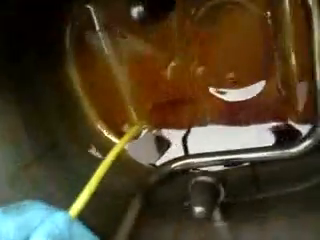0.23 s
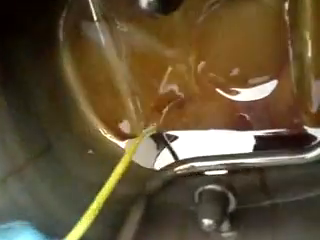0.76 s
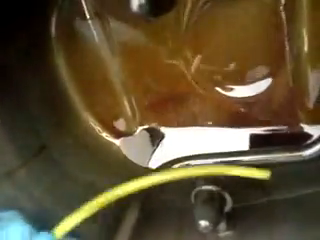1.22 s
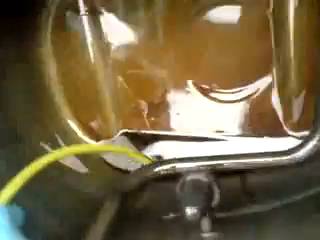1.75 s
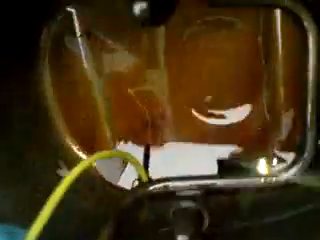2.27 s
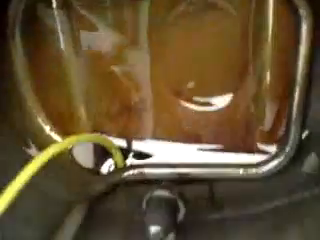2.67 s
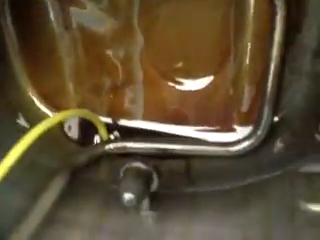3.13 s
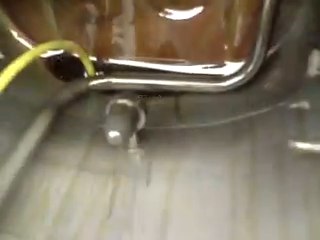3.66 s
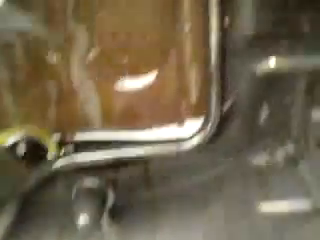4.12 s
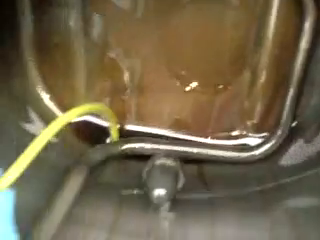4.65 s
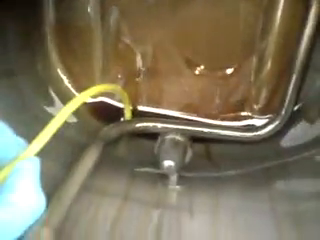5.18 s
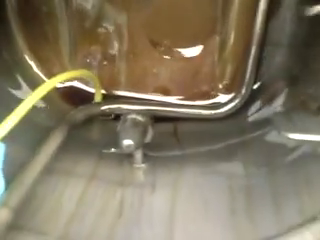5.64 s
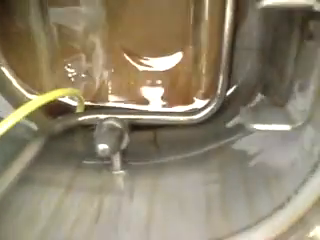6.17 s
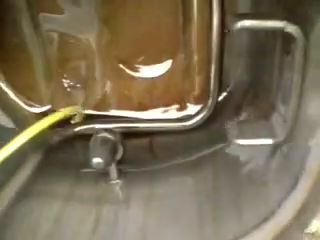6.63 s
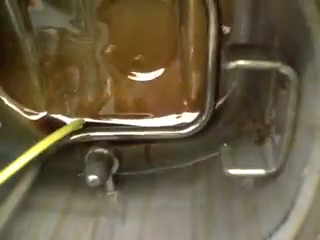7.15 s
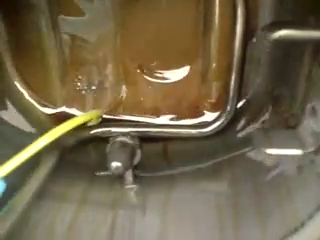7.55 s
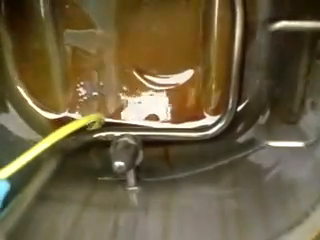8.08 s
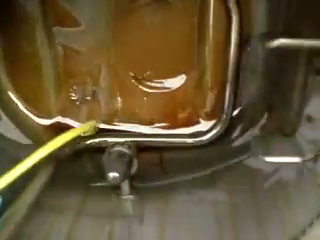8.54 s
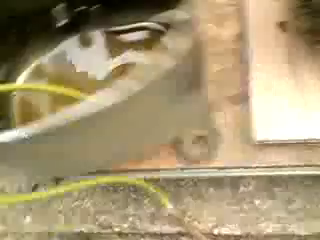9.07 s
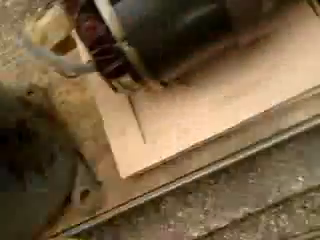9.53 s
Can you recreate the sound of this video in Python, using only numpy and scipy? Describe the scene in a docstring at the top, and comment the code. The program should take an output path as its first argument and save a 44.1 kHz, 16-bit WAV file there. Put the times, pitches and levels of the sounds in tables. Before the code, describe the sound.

From the start, a thin plastic tube sucks air and oil inside a hollow metal housing, close to the microphone. Its hiss is resonant and wet, dotted with tiny bubbling pops and edged with an airy whistle. Behind it a pump motor hums low over a soft rumble and distant workshop hiss. At about 1.5 seconds the hiss turns brighter for roughly a second. From about 2.7 to 4.3 seconds oil repeatedly chokes and frees the tube, giving quick gulps and sputters, while the hum swells. The suction then runs steadier, with scattered pops and the hum rising and falling. At about 8.9 seconds there is one short hollow knock and the hiss drops sharply. Several brief, thin squeaks follow over the hum, with a short high whistle at around 9.7 seconds.

```python
"""A thin tube sucks air and oil inside a hollow metal housing, close to the microphone: a hiss that
sputters as oil slugs close and free the tube mouth, ringing the housing's air modes. The pump motor
hums behind it, over far workshop hiss. Late on something knocks, the microphone turns from the
housing towards the pump, and a thin whistle starts."""
import sys
import numpy as np
from scipy import signal
from scipy.fft import rfft, irfft, next_fast_len
from scipy.io import wavfile
from scipy.ndimage import uniform_filter1d, map_coordinates

SR = 44100
rng = np.random.default_rng(int(sys.argv[2]) if len(sys.argv) > 2 else 0)


def wav_out(sig):
    """Save sig, one row per channel (or a flat mono array), as 16-bit PCM at SR to the path in sys.argv[1]."""
    wavfile.write(sys.argv[1], SR, np.round(np.clip(np.atleast_2d(sig).T, -1, 1) * 32767).astype(np.int16))


N = 432165
TIME = np.arange(N) / SR


def amp(db):
    """Decibels to gain."""
    return 10 ** (np.asarray(db) / 20)


def unit(x):
    """Scaled to rms 1."""
    return x / np.sqrt(np.mean(x ** 2) + 1e-20)


def along(points, hz):
    """Reads (f/Hz, value) points on a log axis."""
    f, v = np.transpose(points)
    return np.interp(np.log(hz + 1), np.log(f + 1), v)


def curves(rows):
    """One value per sample for each column after the time."""
    times, *columns = np.transpose(rows)
    return [np.interp(TIME, times, column) for column in columns]


def wobble(rate, size=N):
    """A smooth random curve, rate knots a second."""
    knots = rng.standard_normal(int(size * rate / SR) + 4)
    return map_coordinates(knots, [np.arange(size) * rate / SR])


def filtered(x, response):
    """x times a complex response of frequency."""
    m = next_fast_len(N + SR // 2)
    return irfft(rfft(x, m) * response(np.fft.rfftfreq(m, 1 / SR)), m)[..., :N]


def above(f, edge_hz, steep):
    """A smooth step from 0 to 1 at the edge."""
    return 1 / (1 + (edge_hz / (f + 1)) ** steep)


def resonance(f, centre_hz, width_hz):
    """One causal mode."""
    return 1j * f * width_hz / (centre_hz ** 2 - f * f + 1j * f * width_hz)


def ringing(x, *pitches_hz, width_hz):
    """x through a steep resonance at each pitch, at rms 1."""
    return unit(filtered(x, lambda f: sum(resonance(f, hz, width_hz) ** 2 for hz in pitches_hz)))


def tone(hz, db, waver_hz, rate):
    """A slightly unsteady sine on a pitch and level curve."""
    return np.sqrt(2) * amp(db) * np.sin(2 * np.pi * np.cumsum(hz + waver_hz * wobble(rate)) / SR)


# Room tone spectrum: f/Hz, level/dB
ROOM_SPECTRUM = [(530, -32.5), (900, -7), (1370, -5), (1710, -18.5), (2240, -3.5), (2580, -9.5),
                 (4160, -10), (7200, -35.5), (15800, -120)]
def workshop():
    """Steady hiss, far from the microphone."""
    return amp(-39.5) * unit(filtered(rng.standard_normal(N), lambda f: amp(along(ROOM_SPECTRUM, f))))


# Rumble spectrum: f/Hz, level/dB
RUMBLE_SPECTRUM = [(20, -21), (48, -4.5), (69, -3.5), (91, -5), (117, -4), (145, -9.5), (274, -2.5),
                   (300, -17.5), (660, -120)]
# Rumble, motor hum and its second harmonic: t/s, level/dB
RUMBLE_LEVEL = [(0.0, -50.5), (1.34, -53), (1.77, -64), (3.74, -45.5), (4.15, -53), (8.76, -51.5),
                (8.82, -45.5), (9.8, -50)]
HUM_LEVEL = [(0.0, -49), (1.28, -51.5), (1.5, -59), (2.21, -56.5), (2.65, -61.5), (3.1, -44), (3.47, -33.5),
             (4.0, -45), (4.9, -50), (5.08, -38), (5.35, -35.5), (5.7, -45.5), (6.41, -45.5), (6.79, -33),
             (7.42, -42), (8.08, -37), (9.01, -46), (9.8, -41)]
OVERTONE_LEVEL = [(0, -67), (2.6, -69.5), (2.9, -51.5), (3.5, -54.5), (6.2, -63.5), (6.7, -58), (7.3, -58),
                  (7.6, -60), (7.95, -53), (8.3, -58.5), (9.8, -68)]
def pump(start_hz=101.3, sag_hz_per_s=0.66):
    """Behind the housing the motor hums over a low rumble, slowing a little under load."""
    spectrum = lambda f: amp(along(RUMBLE_SPECTRUM, f)) + amp(-13.5) * resonance(f, 65, width_hz=5)
    rumble = unit(filtered(rng.standard_normal(N), spectrum))
    hz = start_hz - sag_hz_per_s * TIME
    hum = tone(hz, *curves(HUM_LEVEL), waver_hz=0.9, rate=40)
    overtone = tone(2 * hz, *curves(OVERTONE_LEVEL), waver_hz=3, rate=15)
    return hum + overtone + amp(*curves(RUMBLE_LEVEL)) * rumble


# Thin tones as the microphone turns: start/s, end/s, f/Hz, width/Hz, level/dB
THIN_TONES = [(8.928, 9.073, 1113, 71, -31.5), (8.967, 9.059, 1637, 210, -31.5),
              (9.11, 9.28, 886, 100.4, -37), (9.25, 9.33, 2900, 300, -41), (9.25, 9.4, 2045, 230, -45),
              (9.319, 9.51, 1387, 81, -41), (9.359, 9.415, 898, 60, -38), (9.425, 9.65, 2175, 202, -40),
              (9.674, 9.83, 2927, 12, -34), (9.682, 9.737, 3900, 140, -40)]
def squeaks(ramp_s=0.0065):
    """Brief, narrow bands of air noise; the narrowest is a nearly pure whistle."""
    out, t = np.zeros(N + SR), np.arange(SR // 4) / SR
    for start, end, hz, width_hz, db in THIN_TONES:
        waver = 1 + width_hz / 60 * (wobble(width_hz, len(t)) + 1j * wobble(width_hz, len(t)))
        band = unit(np.real(waver * np.exp(2j * np.pi * hz * t)))
        gate = np.clip(np.minimum(t, end - start - t) / ramp_s, 0, 1)
        out[round(start * SR):][:len(t)] += amp(db) * gate * band
    return out[:N]


# Modes of the knock: f/Hz, level/dB, t60/s
KNOCK_MODES = [(220, -5, 0.028), (349, -17, 0.034), (795, -19, 0.06), (3640, -15.5, .02)]
# Its contacts: t/s, ring/dB, upper mode boost/dB, crack/dB
CONTACTS = [(8.888, 2.5, -2, -47), (8.9024, -12, 18.5, -4)]
def knock(crack_t60_s=0.017):
    """A hollow knock: a soft low push, then a sharper contact that wakes the upper modes."""
    out, t = np.zeros(N + SR), np.arange(SR // 4) / SR
    for s, ring_db, upper_db, crack_db in CONTACTS:
        blow = amp(crack_db - 60 * t / crack_t60_s) * rng.standard_normal(len(t))
        for hz, db, t60 in KNOCK_MODES:
            fade = amp(ring_db + db + upper_db * (hz > 300) - 60 * t / t60)
            swell = 1 - np.exp(-t * hz)  # builds over one cycle
            blow += fade * swell * np.sin(2 * np.pi * hz * t)
        out[round(s * SR):][:len(t)] += blow
    return filtered(out[:N], lambda f: 1 - above(f, 4100, steep=6))


# Air modes of the housing: f/Hz, width/Hz, level/dB
AIR_MODES = [(354.8, 37.7, 10.5), (887.6, 17.7, 5.5), (1133, 60, -6), (1503, 100, -3.5), (1954, 35, 9.5),
             (2010, 53, 5.5), (2047, 230, -4.5), (2277, 120, -2.5), (2447, 24, -0.5), (2577, 11, 4),
             (2855, 86, 0), (2965, 60, 3.5), (3210, 230, 0.5), (3823, 70, -1.5), (4144, 44, 0),
             (4360, 200, -7), (4664, 170, -0.5), (5120, 420, -7), (5860, 110, -14)]
# Dips in its response: f/Hz, width/Hz, depth/0-1
HOUSING_DIPS = [(3060, 83, 0.6), (3935, 81, 0.4), (2047, 25, 0.4), (2520, 38, 0.9)]
# Spectrum of the jet: f/Hz, level/dB
JET_SPECTRUM = [(120, -23.5), (250, -11), (500, -6), (1000, -3.5), (2500, -4.5), (5000, -3), (6000, -10),
                (6900, -15.5), (7250, -41.5)]
def housing(f):
    """From tube to microphone: air modes over a flat direct path, coloured by the jet."""
    modes = sum(amp(db) * resonance(f, hz, width) for hz, width, db in AIR_MODES)
    dips = np.prod([1 - depth * resonance(f, hz, width) for hz, width, depth in HOUSING_DIPS], axis=0)
    return (modes + amp(-6.5)) * dips * amp(along(JET_SPECTRUM, f))


def housing_band(x, low_hz, high_hz):
    """One band of x heard through the housing, at rms 1."""
    band = lambda f: above(f, low_hz, steep=18) * (1 - above(f, high_hz, steep=15.1))
    return unit(filtered(x, lambda f: housing(f) * band(f)))


# Echo off the oil under the lifted tube: t/s, first cancelled f/Hz, strength/0-1
OIL_ECHO = [(.72, 535, 0.1), (.78, 627, 0.8), (1.1, 677, 0.3), (1.47, 888, 0.3), (1.52, 587, 0.2),
            (2.2, 538, 0.11)]
def oil_echo(x):
    """An inverted reflection cuts a comb of dips that climbs as the path shortens."""
    first_hz, strength = curves(OIL_ECHO)
    late = np.interp(TIME - 1 / first_hz, TIME, x)
    return (x - strength * late) / np.sqrt(1 + strength ** 2)


# Treble dip: t/s, f/Hz, depth/0-1
NOTCH_PATH = [(0, 5540, .9), (.62, 5620, .9), (.72, 5620, 0.06), (4.5, 5560, 0), (4.6, 5560, .85),
              (5.22, 5580, .85), (5.27, 4500, 0), (5.9, 4480, 0.9), (6.2, 4690, 0.4), (6.55, 4790, .8),
              (6.9, 5200, 0.9), (7.55, 4850, 0.9), (8.5, 4930, .85), (8.6, 4900, 0)]
def notched(x, width_hz=90):
    """A narrow dip wanders as the tube moves."""
    f, t, spectra = signal.stft(x, SR, nperseg=1024)
    times, hz, depth = np.transpose(NOTCH_PATH)
    offset_hz = f[:, None] - np.interp(t, times, hz)
    dip = np.interp(t, times, depth) * np.exp(-(offset_hz / width_hz) ** 2)
    return signal.istft(spectra * (1 - dip), SR, nperseg=1024)[1][:N]


def bubbles(count, low_hz=2500, high_hz=6000):
    """Tiny oil bubbles burst: damped sines a few cycles long, of scattered pitch and size."""
    when, pitch, size = rng.random((count, 3)).T
    t = np.arange(SR // 200) / SR
    hz = low_hz * (high_hz / low_hz) ** pitch[:, None] ** 1.6
    gain = amp(np.minimum(-4 * np.log(size + 1e-9), 12))[:, None]
    grains = gain * np.exp(-t * hz / 3.05) * np.sin(2 * np.pi * hz * t)
    where = (when * N).astype(int)[:, None] + np.arange(len(t))
    return unit(np.bincount(where.ravel(), grains.ravel())[:N])


def film_flutter(per_s=95, tail_s=0.004):
    """The oil film at the mouth snaps open at an uneven rate: sudden starts, short tails."""
    gap, size = rng.random((round(N / SR * 200), 2)).T
    starts = (np.cumsum(0.5 + gap) * SR / per_s).astype(int)
    snaps = np.bincount(starts, size, N)[:N]
    return signal.lfilter([1], [1, -np.exp(-1 / (SR * tail_s))], snaps)


# How hard slugs chop the flow: t/s, depth/dB
CHOP_DEPTH = [(0, 2.5), (1.5, 2.5), (2.2, 2), (2.6, 5), (3.1, 3), (3.7, 4.5), (4.1, 2), (8.8, 2.5),
              (9.8, 1.1)]
def flow(ticks_per_s=90):
    """Chopped turbulence at the mouth; deeper chopping brings more bubbles and ticks of bursting film."""
    depth_db, = curves(CHOP_DEPTH)
    slugs = amp(depth_db * (0.67 * wobble(30) + 0.45 * wobble(220)))
    film = 1 + 0.52 * depth_db * film_flutter()
    wetness = np.clip(0.39 * (depth_db - 0.8), 0, 1.5)
    ticks = unit(rng.standard_normal(N) * (rng.random(N) < ticks_per_s / SR))
    air = slugs * film * (rng.standard_normal(N) + wetness * (bubbles(count=12000) + 0.13 * ticks))
    return air / np.sqrt(np.abs(uniform_filter1d(air ** 2, SR // 16)))  # evens out slow swells


# Oil plugs: deepest t/s, hiss drop/dB, closing time/s
OIL_PLUGS = [(1.23, 5.5, 0.088), (2.868, 9, .02), (3.035, 9.5, 0.035), (3.12, 15.5, 0.019),
             (3.31, 6.5, 0.086), (3.578, 16.5, 0.031), (3.695, 1, 0.025), (4.69, 3.5, 0.11),
             (8.016, 8, 0.045), (8.835, 7.5, 0.055)]
def choking(clear_ratio=0.66):
    """Drop in dB as each plug closes the tube gradually and clears faster."""
    drop_db = np.zeros(N)
    for s, db, close_s in OIL_PLUGS:
        past = (TIME - s) / close_s
        drop_db += db * np.clip(np.minimum(1 + past, 1 - past / clear_ratio), 0, 1)
    return drop_db


# Gulps of air: loudest t/s, hiss rise/dB, half length/s
AIR_GULPS = [(2.763, 7.5, 0.013), (2.852, 5, 0.017), (2.898, 4, 0.021), (2.944, 8.5, 0.033),
             (2.992, 6.5, 0.017), (3.062, 7, 0.01), (3.106, 5.5, .02), (3.149, 5, .03), (3.193, 8, 0.025),
             (3.409, 9, 0.022), (3.498, 9, 0.022), (3.6, 6, 0.022), (3.646, 4.5, 0.019),
             (3.721, 10.5, 0.02), (3.969, 5, 0.02), (4.16, 4.5, 0.023), (4.286, 5, 0.036)]
def gulping():
    """Smooth humps in dB as the mouth skims the oil."""
    return sum(db * np.clip(1 - ((TIME - s) / half_s) ** 2, 0, 1) for s, db, half_s in AIR_GULPS)


# The housing's two lowest modes: t/s, boom/dB, second mode/dB
LOW_MODE_LEVELS = [(0.0, -33.5, -28.5), (1.39, -29.5, -34.5), (1.58, -39, -38), (2.67, -41.5, -40.5),
                   (3.96, -34, -33), (6.01, -33.5, -31.5), (8.87, -31.5, -31.5), (8.9, -26.5, -37),
                   (8.98, -35.5, -36), (9.28, -37, -56), (9.42, -44.5, -43.5), (9.8, -44, -42)]
def cavity(calm, choke_db):
    """The flow sounds the hollow of the housing; plugs choke the second mode."""
    boom_db, second_db = curves(LOW_MODE_LEVELS)
    boom = amp(boom_db) * housing_band(calm, 140, 518)
    return boom + amp(second_db - 0.87 * choke_db) * oil_echo(housing_band(calm, 518, 1040))


# Whistle of the open mouth: t/s, upper/dB, lower/dB
WHISTLE_LEVELS = [(0, -28, -44), (.95, -34.5, -34.5), (.965, -30.5, -34), (1.025, -19, -35.5),
                  (1.18, -35, -28), (1.4, -26, -24.5), (1.55, -29, -37), (2.0, -27.5, -38),
                  (2.18, -22, -33.5), (2.25, -36, -40), (3.3, -43, -44), (3.95, -26, -33),
                  (4.5, -34.5, -39.5), (8.6, -36.5, -36), (9.1, -46, -49)]
# Ring of the lifted tube: t/s, level/dB
RING_LEVEL = [(1.2, -66), (1.27, -30.5), (1.46, -32), (1.55, -41), (1.7, -61.5)]
def tube_mouth(air, calm):
    """The mouth whistles on two close pitches and, lifted, briefly rings higher."""
    upper_db, lower_db = curves(WHISTLE_LEVELS)
    upper = amp(upper_db) * ringing(air + calm, 2091, width_hz=79)
    lower = amp(lower_db) * ringing(air + calm, 2013, width_hz=79)
    return upper + lower + amp(*curves(RING_LEVEL)) * ringing(air, 2900, 3350, width_hz=120)


def free_jet(air, on_s=1.465, hold_s=0.25, attack_db_per_s=1101.5, fade_db_per_s=32):
    """Clear of the oil, the tube draws a bright jet that starts suddenly, holds and fades."""
    t = TIME - on_s
    db = -26 + attack_db_per_s * np.minimum(t, 0) - fade_db_per_s * np.maximum(t - hold_s, 0)
    return amp(db) * ringing(air, 4490, width_hz=1200)


# Slugs breaking at the mouth: t/s, level/dB, pop f/Hz
SLUG_BREAKS = [(0.5462, -7, 3940), (0.663, -7, 2160), (0.7376, -5, 4450), (0.7832, -8.5, 3180),
               (0.8458, -5.5, 4270), (0.929, -9.5, 4610), (0.9613, -7, 2100), (1.012, -3, 2120),
               (1.0318, -6, 2170), (1.264, -13, 2980), (1.4628, -4, 2004), (1.484, -4.5, 2060),
               (1.5477, -4.5, 3840), (1.62, -7, 4460), (1.667, -11, 2095), (1.807, -16, 2126),
               (1.928, -3.5, 4430), (2.159, -6, 2104), (2.2042, -4, 2900), (2.2465, -5.5, 3270),
               (2.358, -10, 3310), (2.633, -13.5, 1985), (2.841, -10.5, 5190), (2.874, -11, 2020),
               (2.98, -8.5, 3210), (3.0033, -7.5, 3210), (3.0581, -5.5, 3300), (3.1301, -13.5, 2094),
               (3.1496, -7, 2920), (3.2125, -7, 3040), (3.2366, -8.5, 2940), (3.277, -9.5, 5070),
               (3.3334, -14.5, 3210), (3.4066, -7, 2860), (3.4693, -11, 3250), (3.5145, -13.5, 2566),
               (3.5928, -10.5, 2820), (3.629, -1.5, 3020), (3.665, -8.5, 2910), (3.739, -7.5, 2095),
               (3.8554, -6, 3250), (3.9, -5, 2024), (4.1996, -6, 3000), (4.268, -6, 2960),
               (4.579, -3.5, 2040), (4.714, -6, 4220), (4.7266, -6, 3810), (5.417, -5.5, 3300),
               (5.5948, -7, 2850), (5.866, -3, 2990), (6.1417, -6, 3000), (6.439, -5, 2920),
               (7.237, -5, 3030), (7.426, -6, 2910), (7.4748, -7.5, 3220), (7.7414, -15, 3330),
               (7.9782, -2.5, 3420), (8.0933, -8, 2960), (8.204, -7.5, 3490), (8.55, -15, 2890),
               (8.64, -15, 3090), (8.737, -13, 1970), (8.804, -13.5, 2140)]
def spurts(t60_s=0.024, attack_s=0.0006, snap_db=6.5):
    """Each freed slug pops at its own pitch and lets a snap and a burst of air into the housing."""
    pops, air, t = np.zeros(N + SR), np.zeros(N + SR), np.arange(SR // 8) / SR
    for s, db, hz in SLUG_BREAKS:
        start = round(s * SR)
        fade = amp(db - 60 * t / t60_s) * (1 - np.exp(-t / attack_s))
        slip = np.cumsum(rng.normal(0, 0.12, len(t)))  # a wet, unsteady ring
        pops[start:][:len(t)] += amp(-3) * fade * np.sin(2 * np.pi * hz * t + slip)
        air[start:][:len(t)] += fade * rng.standard_normal(len(t))
        air[start + SR // 1000] += amp(db + snap_db)
    return pops[:N] + filtered(air[:N], lambda f: amp(4.5) * housing(f) * above(f, 1100, steep=2.4))


# Hiss at the microphone: t/s, level/dB
HISS_LEVEL = [(0, -24), (.66, -26.5), (.8, -22.5), (1.04, -27.5), (1.27, -24.5), (1.44, -21), (1.47, -19.5),
              (1.9, -23), (2.16, -17), (2.23, -20.5), (2.26, -27), (3.0, -30.5), (3.49, -30), (3.75, -26.5),
              (4.1, -21), (4.5, -21), (5.0, -19.5), (7.76, -20.5), (8.35, -21.5), (8.88, -27.5),
              (9.07, -41), (9.8, -38.5)]
# Its bands, relative to that level: t/s, middle/dB, bright/dB, top/dB
HISS_BANDS = [(0, 1, 0.5, -8), (.6, 2, -4.5, -12), (1.0, -11.5, -7.5, -7), (1.2, -0.5, -7.5, -8.5),
              (1.45, -9.5, -5.5, -13.5), (1.49, -15.5, -3, -6), (1.95, -15, -6.5, -9), (2.32, -8, -10, -8),
              (3.2, -0.5, -15.5, -6.5), (3.93, -2.5, -12, -7), (4.4, -5.5, -5, -12), (5.8, -5, -9.5, -11),
              (6.47, -6.5, -13.5, -8), (6.55, -5.5, -14.5, -13), (6.9, -4.5, -6.5, -15.5),
              (7.8, -6.5, -13, -11.5), (8.6, -4, -11, -13), (8.9, 1.5, -8, -8.5), (9.8, -1.5, -6.5, -7.5)]
def hiss(air, calm, choke_db):
    """The tube's place in the housing sets which bands speak; gulps ring the oil-narrowed mouth."""
    hiss_db, = curves(HISS_LEVEL)
    middle_db, bright_db, top_db = curves(HISS_BANDS)
    gulp_db = gulping()
    middle = amp(middle_db - 0.5 * gulp_db) * oil_echo(housing_band(air + 0.53 * calm, 1065, 1787))
    core = amp(-2.5) * housing_band(air, 2060, 3710)
    bright = amp(bright_db) * housing_band(air, 3530, 4370)
    top = amp(top_db) * housing_band(air, 4955, 8300)
    gulp_ring = amp(hiss_db - 9.5) * (amp(gulp_db) - 1) * ringing(air + calm, 3185, width_hz=170)
    return notched(amp(hiss_db + gulp_db - choke_db) * (middle + core + bright + top)) + gulp_ring


def suction():
    """The tube, close up: one flow drives hiss, housing, mouth and jet, and slugs spurt over it."""
    air, choke_db = flow(), choking()
    calm = 0.41 * air + rng.standard_normal(N)  # narrow modes smooth the chopping out
    resonances = cavity(calm, choke_db) + tube_mouth(air, calm)
    return hiss(air, calm, choke_db) + resonances + free_jet(air) + spurts()


def scene():
    """One microphone close to the housing, with the pump and workshop behind."""
    return (suction() + pump() + workshop() + knock() + squeaks())[None]


def record(dry, ceiling=0.72, top_hz=7290):
    """The recorder rounds off peaks and passes nothing above its band limit."""
    rounded = dry / (1 + np.abs(dry / ceiling) ** 6) ** (1 / 6)
    return filtered(rounded, lambda f: f < top_hz)


dry = scene()
out = record(dry)
wav_out(out)
```